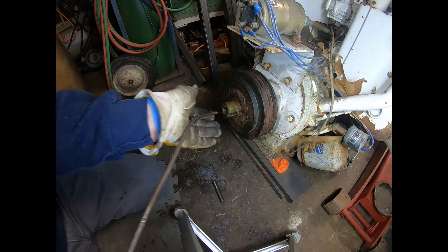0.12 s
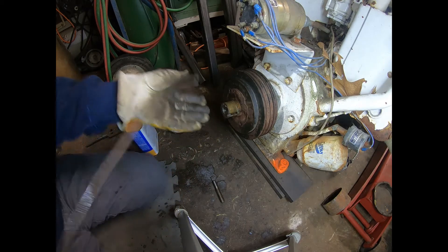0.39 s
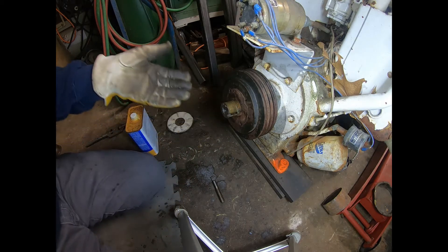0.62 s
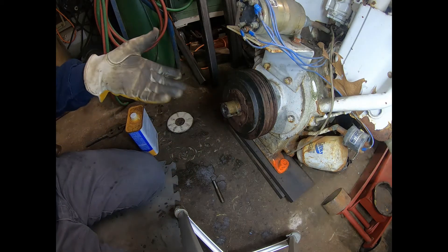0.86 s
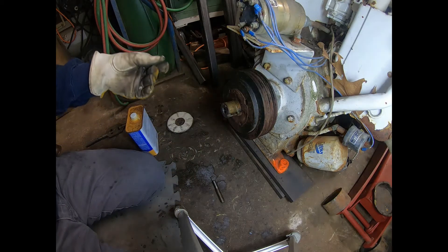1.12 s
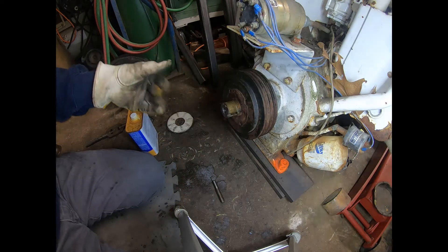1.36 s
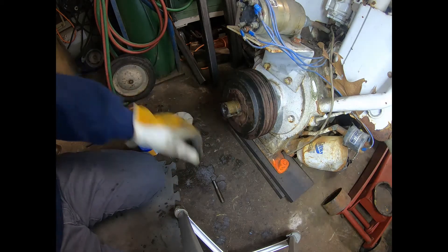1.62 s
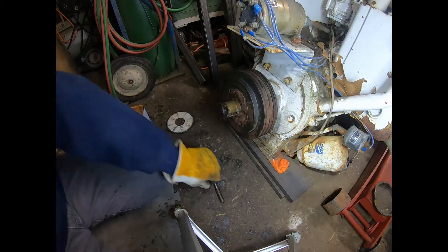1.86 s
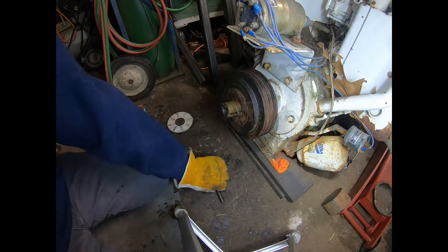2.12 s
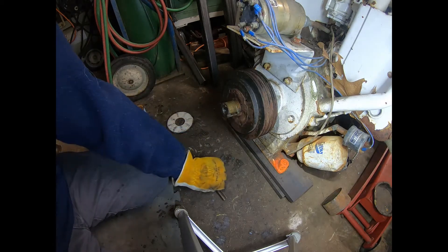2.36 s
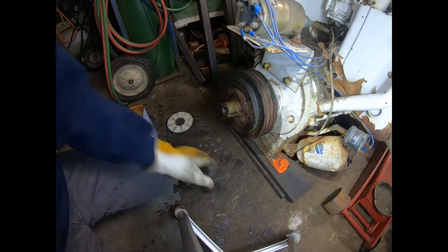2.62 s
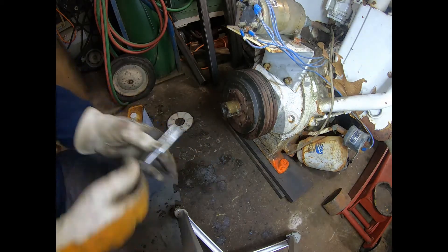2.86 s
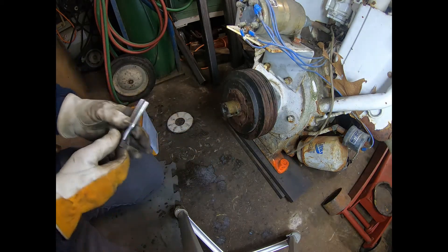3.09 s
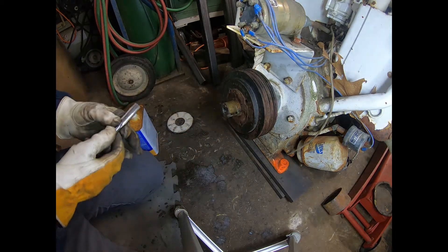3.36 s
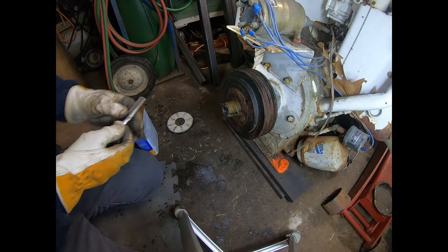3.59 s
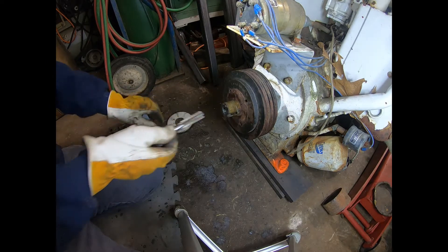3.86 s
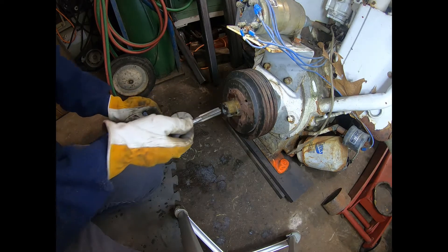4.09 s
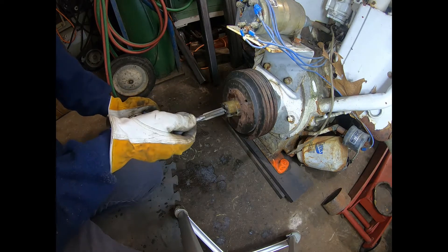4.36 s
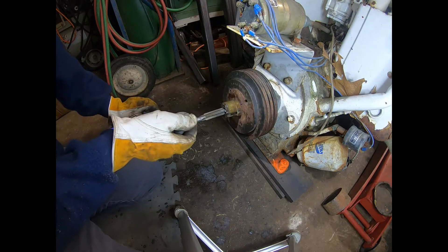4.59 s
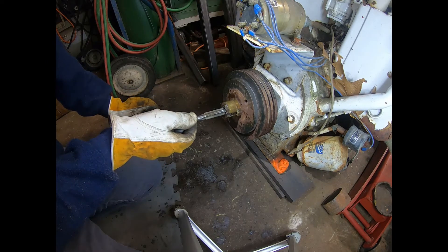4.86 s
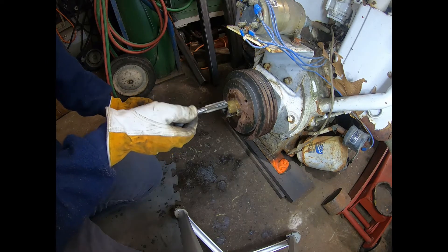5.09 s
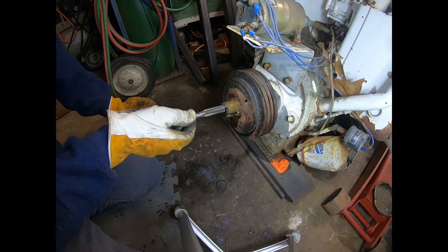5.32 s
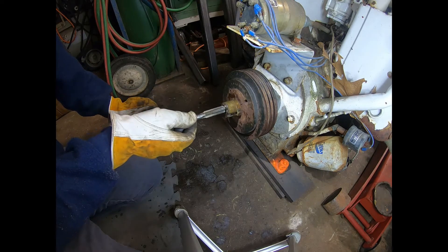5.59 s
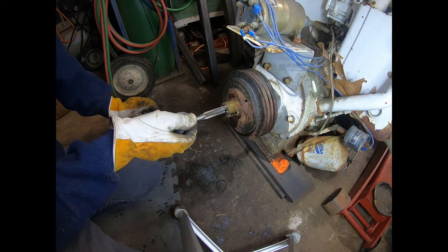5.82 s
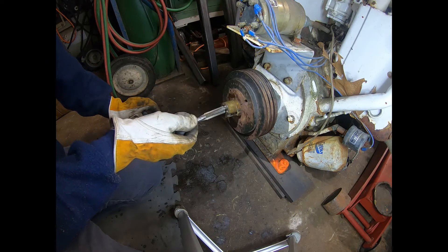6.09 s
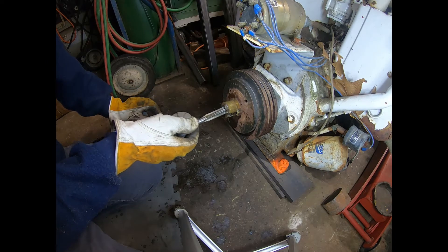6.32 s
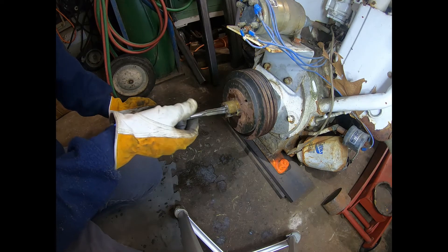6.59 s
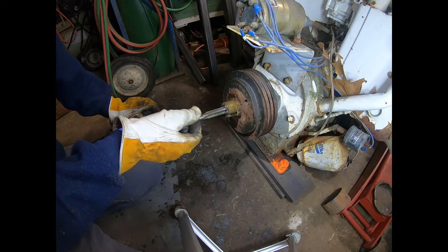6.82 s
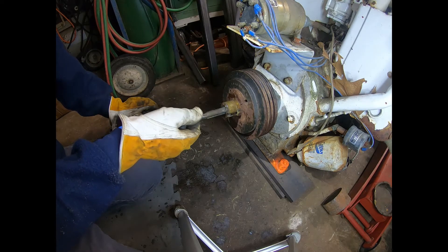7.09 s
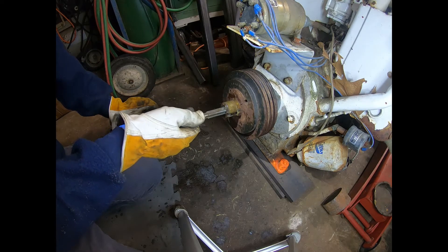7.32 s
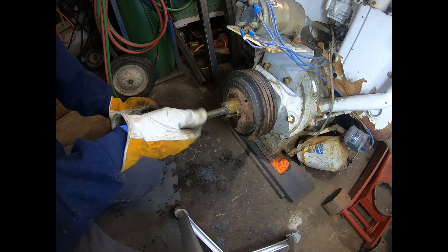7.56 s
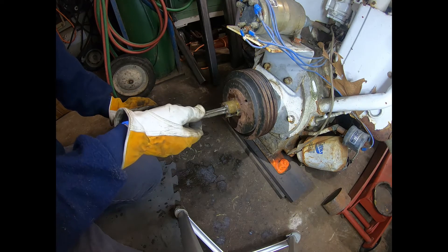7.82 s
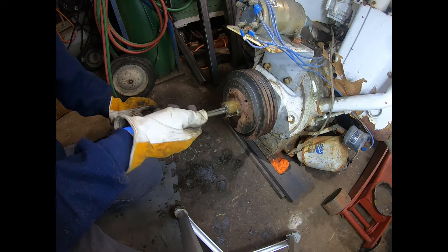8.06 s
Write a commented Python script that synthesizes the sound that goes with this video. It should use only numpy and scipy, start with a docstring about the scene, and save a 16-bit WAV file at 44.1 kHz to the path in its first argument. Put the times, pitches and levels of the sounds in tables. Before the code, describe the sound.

A motor drone with a rapid chugging pulse, about eleven beats a second, fills a small hard-floored garage throughout. Rumble and hum swell over the first couple of seconds and then hold. A short gritty scrape with tiny metallic rings comes close by as a gloved hand picks up a tool. Afterwards only the compressor remains, clattering, rushing and faintly whistling. Mono, close worker's position, the machine a few metres off.

```python
"""A belt-driven piston air compressor runs steadily in a garage, a few metres from the listener.
Its motor hums at twice the mains rate: a sine with sidebands. The pump throbs at multiples of the crank
speed, knocks ring the modes of its housing and valve plate, small parts clatter, and filtered noise makes
the air's rumble, rush and pulsing whistle. A faint narrow noise hisses twice early on, and a small metal
tool scrapes briefly over the concrete floor: grit noise with short decaying rings."""
import sys
import numpy as np
from scipy import signal
from scipy.fft import rfft, irfft
from scipy.io import wavfile

SR = 44100
rng = np.random.default_rng(int(sys.argv[2]) if len(sys.argv) > 2 else 0)


def makeup_ratio(level_db):
    """Linear amplitude ratio for a level in decibels (20 dB per factor of ten)."""
    decades = np.asarray(level_db, float) / 20
    return 10 ** decades


def materialize(psi):
    """Save the field psi as 16-bit PCM at rate SR to the path in sys.argv[1].

    A 1-D psi becomes a single channel; in a 2-D psi each row is a channel.
    """
    bounded = np.clip(np.atleast_2d(psi).T, -1, 1)
    quanta = np.round(bounded * 32767).astype(np.int16)
    wavfile.write(sys.argv[1], SR, quanta)


N = 361177
TIME = np.arange(N) / SR   # s
BIN_HZ = np.maximum(np.arange(N // 2 + 1) * SR / N, 1)

# lift of the middle of the air rush and of the clatter: time_s, lift_db
MIDDLE_LIFT = [(0, 0.5), (1.1, 2.4), (1.8, 4), (2.8, 1.5), (4.6, 1.2), (6.5, 1), (8.19, 2.4)]
# level of the rumble, which the weak crank orders follow: first_db, crest_s, crest_db, settled_db
RUMBLE_SWELL = (-33, 2, -27.5, -29)


def rms_one(x):
    """Normalisation: scales a signal to unit root-mean-square."""
    return x / np.sqrt(np.mean(x ** 2) + 1e-20)


def in_time(rows):
    """Linear interpolation: joins the columns of a table by straight lines in time."""
    s, *columns = np.transpose(rows)
    return [np.interp(TIME, s, column) for column in columns]


def swell(first_db, crest_s, crest_db, settled_db):
    """Level envelope: a quarter-sine rise to a crest, then exponential relaxation over 1 s."""
    rise = first_db + (crest_db - first_db) * np.sin(np.pi / 2 * np.clip(TIME / crest_s, 0, 1))
    return rise + (settled_db - crest_db) * (1 - np.exp(-np.maximum(TIME - crest_s, 0) / 1))


def smooth_step(at_s, span_s):
    """Sigmoid transition: a hyperbolic tangent from 0 to 1."""
    return .5 + .5 * np.tanh((TIME - at_s) / span_s)


def crossfade(count):
    """Equal-power crossfading: sine-law weights of a row of patterns spread over the whole time."""
    place = TIME / TIME[-1] * (count - 1)
    return [np.sin(np.pi / 2 * np.clip(1 - np.abs(place - k), 0, 1)) for k in range(count)]


def drift(rate_hz):
    """Low-pass random process: two equal poles leave a slow wander of spread 1."""
    hop = 40   # samples between the values drawn
    r = np.exp(-2 * np.pi * rate_hz * hop / SR)
    slow = signal.lfilter([1], [1, -2 * r, r * r], rng.standard_normal(N // hop + 2002))
    slow = rms_one(slow[2000:])   # the filter has settled
    return np.interp(np.arange(N) / hop, np.arange(len(slow)), slow)


def sine(turns, db):
    """Pure tone: a cosine of given phase and rms level."""
    return np.sqrt(2) * makeup_ratio(db) * np.cos(2 * np.pi * turns)


def colour(x, spectrum):
    """Linear filtering: gains in dB drawn on a log-frequency axis."""
    hz, db = np.transpose(spectrum)
    gain = makeup_ratio(np.interp(np.log(BIN_HZ), np.log(hz), db, left=-200))
    return irfft(rfft(x) * gain, N)


def band(x, low_hz, high_hz):
    """Band-pass filtering: keeps the part between two corner frequencies."""
    return signal.sosfilt(signal.butter(2, [low_hz, high_hz], "band", fs=SR, output="sos"), x)


def crank_turns():
    """Phase as the integral of frequency: crank turns, the speed sagging as the tank fills."""
    # time_s, speed_turns_per_s
    crank_speed = [(0, 10.927), (3.5, 10.918), (8.19, 10.905)]
    return np.cumsum(in_time(crank_speed)[0]) / SR


def hum_level():
    """Level envelope: the hum's slow course in dB, with a few brief dips of Gaussian shape."""
    # time_s, level_db
    hum_course = [(0, -26), (.55, -23.5), (.8, -18), (1.6, -19), (2.4, -17), (4.5, -16), (5.6, -18.5),
                  (8.19, -18.5)]
    # time_s, depth_db
    hum_dips = [(.45, -12), (1.0, -7), (1.37, -13)]
    dip_span_s = .045
    dips = sum(depth_db * np.exp(-((TIME - s) / dip_span_s) ** 2) for s, depth_db in hum_dips)
    return in_time(hum_course)[0] + dips


def motor(crank):
    """Modulation: the pump's load gives the magnetic hum side tones and shifts the shaft tone."""
    hum_hz, shaft_hz = 119.99, 57.81
    load_lead = .27   # share of a turn by which the load leads the crank
    # side tones: crank_multiple above the hum, first_db, crest_s, crest_db, settled_db
    side_tones = [(1, -56, 4, -24.5, -25.5), (2, -29, 2.6, -27, -30), (4, -36, 6.3, -38, -28.5)]
    # tones beating with the pump: shaft_multiple, crank_multiple, rms_db
    shaft_tones = [(1, 2, -38), (1, 4, -41), (1, 6, -42), (1, 7, -36), (1, 9, -44), (1, 11, -44),
                   (2, 0, -39), (2, 1, -43), (2, 2, -43)]
    hum = hum_hz * TIME - .16
    out = sine(hum, hum_level() + .5 * drift(4))
    for order, *levels in side_tones:
        turns = hum + round(order) * (crank + load_lead) + .025 * drift(2.5)
        out += sine(turns, swell(*levels) + 1.2 * drift(2.5))
    for shaft, order, db in shaft_tones:
        turns = round(shaft) * shaft_hz * TIME + round(order) * crank + rng.random()
        out += sine(turns, db + 1.5 * drift(1.5))
    return out


def throb(crank):
    """Fourier series: pressure pulses as orders of the crank; the room scatters the weak ones in time."""
    # these swell as the listener moves: crank_multiple, first_db, crest_s, crest_db, settled_db
    strong_orders = [(4, -33, 1.1, -28.5, -29.5), (10, -39, 2, -30, -33.5), (14, -45, 1.6, -23, -26),
                     (18, -34, 1.2, -25, -31)]
    # crank_multiple, mean_rms_db
    weak_orders = [(2, -40), (3, -47), (5, -43.5), (6, -34.5), (7, -45), (8, -37), (9, -61), (16, -34.5),
                   (17, -42), (19, -38.5), (20, -39), (21, -39), (22, -42.5), (23, -46), (24, -40.5),
                   (25, -40), (26, -42.5), (27, -44), (28, -48.5), (29, -48), (30, -46), (31, -52),
                   (32, -48), (33, -53.5), (34, -51.5), (35, -53.5), (36, -67), (37, -59.5), (38, -54),
                   (39, -45), (40, -54), (41, -44), (42, -50), (43, -54.5), (44, -60), (45, -67), (46, -42),
                   (47, -60), (48, -42), (49, -65), (50, -50.5), (51, -44), (52, -52)]
    rumble_db = swell(*RUMBLE_SWELL)
    weak_db = rumble_db - np.mean(rumble_db)
    out = np.zeros(N)
    for order, *levels in strong_orders:
        turns = round(order) * crank - .38 + .025 * drift(2.5)
        out += sine(turns, swell(*levels) + 1.2 * drift(2.5))
    for order, db in weak_orders:
        order = round(order)
        # phase and level wander more at high orders
        turns = order * crank + rng.random() + 0.0058 * order * drift(1.7)
        out += sine(turns, db + weak_db + 0.073 * order * drift(1.6))
    return out


def knocks(crank, blows, modes, jitter, soft_hz):
    """Modal synthesis: slightly uneven blows on every turn excite damped resonators; rms 1."""
    blows, turns = np.array(blows), np.arange(int(crank[-1]) + 1)[:, None]
    uneven = jitter * rng.standard_normal((len(turns), len(blows)))   # share of a turn
    when = np.interp(turns + blows[:, 0] + uneven, crank, TIME)
    at = (when * SR).astype(int).ravel()
    out = np.zeros(N)
    for k, (hz, db, t60) in enumerate(modes):
        clicks = np.full(N, 1e-18)
        clicks[at] = makeup_ratio(blows[:, 1] + db + 1.0 * rng.standard_normal(when.shape)).ravel()
        r, w = makeup_ratio(-60 / (t60 * SR)), 2 * np.pi * hz / SR
        ring = signal.lfilter([0, np.sin(w)], [1, -2 * r * np.cos(w), r * r], clicks)
        out += (-1) ** k * ring   # neighbouring modes in opposite phase
    return rms_one(signal.sosfilt(signal.butter(4, soft_hz, fs=SR, output="sos"), out))


def housing(crank):
    """Modal resonance: knocks ring the pump housing, softened by a low-pass."""
    # share_of_turn, relative_db
    housing_knocks = [(.029, -1.2), (.1949, -.9), (.3204, -6.1), (.494, -2), (.7067, -6.8)]
    # frequency_hz, relative_db, t60_s
    housing_modes = [(589.3, -8, .1), (651, 4, .064), (669.3, -.6, .147), (695.9, -1.2, .166),
                     (950, -11, .12), (1222, -18, .2), (1266, -17, .16)]
    # time_s, rms_db
    housing_course = [(0, -43), (.7, -30.5), (1.6, -31), (2.4, -35), (3.9, -32.5), (4.3, -28.5),
                      (5.1, -31.5), (6.2, -27.5), (6.7, -30.5), (8.19, -29.5)]
    ringing = knocks(crank, housing_knocks, housing_modes, jitter=.0004, soft_hz=1300)
    return makeup_ratio(in_time(housing_course)[0]) * ringing


def valve_plate(crank):
    """Modal resonance: knocks ring the valve plate, which sings out more as pressure builds."""
    # share_of_turn, relative_db
    plate_knocks = [(.0696, -6.1), (.2304, -9.3), (.3821, 2.1), (.5584, -5), (.8552, -1.7)]
    # frequency_hz, relative_db, t60_s
    plate_modes = [(1656, 1, .18), (1691.5, 13, .017), (1716, 0, .14), (2240, -11, .07), (3376, -9, .1),
                   (4470, -14, .04), (4560, -13, .04)]
    quiet_db, loud_db = -46, -38.5
    plate_db = quiet_db + (loud_db - quiet_db) * smooth_step(5.5, .45)
    return makeup_ratio(plate_db) * knocks(crank, plate_knocks, plate_modes, jitter=.0001, soft_hz=5000)


def clatter(crank):
    """Periodic noise: small parts repeat a one-turn rattle that slowly gives way to other patterns."""
    # frequency_hz, relative_db
    clatter_colour = [(690, -60), (745, 3), (860, -4), (950, 0), (1060, -4), (1200, 0), (1450, -3),
                      (1600, -9), (1800, -10), (2600, -6), (3200, -30), (4000, -90)]
    count, size = 6, 4096   # patterns, values in one turn
    patterns = rng.standard_normal((count, size))
    where = (crank % 1 * size).astype(int)
    rattle = sum(share * pattern[where] for share, pattern in zip(crossfade(count), patterns))
    return makeup_ratio(-40 + in_time(MIDDLE_LIFT)[0]) * rms_one(colour(rattle, clatter_colour))


def pipes():
    """Resonance: the air excites pipes and cavities, each lifting the gain around its frequency."""
    # frequency_hz, width_hz, lift_db
    resonances = [(345, 3.9, 6.5), (455, 15, 0), (637.4, 32, 8), (954, 40, 5.5), (1470, 110, 2),
                  (2174, 67, 3.5), (2700, 150, 1.5), (4000, 160, 3)]
    return makeup_ratio(sum(db / (1 + (2 * (BIN_HZ - hz) / width_hz) ** 2) for hz, width_hz, db in resonances))


def patchy_noise(spectrum, unit_hz, patchy_db):
    """Turbulence as filtered noise, each octave flickering on its own; rms 1 in the band unit_hz."""
    noise = pipes() * rfft(colour(rng.standard_normal(N), spectrum))
    out, together = 0, drift(1.1)
    for centre in 2. ** np.arange(5, 15):
        # overlapping octave windows that add up to 1
        share = np.cos(np.pi / 2 * np.clip(np.log2(BIN_HZ / centre), -1, 1)) ** 2
        out = out + irfft(noise * share, N) * makeup_ratio(patchy_db * (0.3 * together + drift(19.0)))
    return out / np.std(band(out, *unit_hz))


def rumble():
    """Low-frequency flow noise: patchy noise whose level swells and settles."""
    # frequency_hz, relative_db_per_hz
    rumble_colour = [(10, -45), (36, -36), (55, -14), (72, -13), (100, -8), (135, -3.5), (185, -5),
                     (215, -7), (300, -9), (420, -11), (500, -16), (600, -14), (705, -13), (740, -25),
                     (2000, -90)]
    return makeup_ratio(swell(*RUMBLE_SWELL)) * patchy_noise(rumble_colour, (230, 480), patchy_db=1.8)


def rush(crank):
    """Amplitude-modulated flow noise: the intake gulps once a turn and the treble flickers in patches."""
    # frequency_hz, relative_db_per_hz
    rush_colour = [(450, -13), (760, -4), (870, -8.5), (1180, -5.5), (1600, -11), (2590, -10.5),
                   (3780, -14.5), (4700, -18), (5250, -25.5), (5790, -35), (6710, -31.5), (8600, -34.5),
                   (10100, -47), (11500, -47), (12800, -43.5), (15600, -52)]
    # edges of the flickering treble bands: frequency_hz
    treble_edges = (5600, 6200, 6800, 7400, 8100, 8800, 9600, 10500, 11600, 12800, 14100, 15500)
    stroke = np.maximum(np.cos(2 * np.pi * (crank - .52)), 0) ** 2
    rush_db = swell(-39.5, 1.3, -39.5, -40) + 1.4 * stroke
    air = makeup_ratio(rush_db) * patchy_noise(rush_colour, (1900, 5000), patchy_db=0.67)
    whole, together = rfft(air), .6 * drift(25)
    for low_hz, high_hz in zip(treble_edges, treble_edges[1:]):
        patch = irfft(whole * (BIN_HZ >= low_hz) * (BIN_HZ < high_hz), N)
        air += (makeup_ratio(-2 + together + 2.1 * drift(22)) - 1) * patch
    middle_filter = signal.butter(2, [1000, 2200], "band", fs=SR, output="sos")
    middle = signal.sosfiltfilt(middle_filter, air)   # zero phase, so that it adds in step
    return air + (makeup_ratio(in_time(MIDDLE_LIFT)[0]) - 1) * middle


def garage(x):
    """Reverberation: direct sound plus dense decaying echoes, changing as the listener moves."""
    t60_s, wet_db, places = .25, -8, 6
    tail = np.arange(int(.3 * SR)) / SR
    out = x.copy()
    for near in crossfade(places):
        echoes = rng.standard_normal(len(tail)) * makeup_ratio(-60 * tail / t60_s)
        out += makeup_ratio(wet_db) * near * signal.fftconvolve(x, echoes / np.linalg.norm(echoes))[:N]
    return out / np.sqrt(1 + makeup_ratio(2 * wet_db))


def whistle(crank):
    """Narrow-band noise of air in a narrow passage, amplitude-modulated by puffs past the valves."""
    # time_s, level_db between puffs
    whistle_course = [(0, -54), (1.6, -56), (2.5, -65.5), (3.2, -55), (4.5, -50.5), (5, -63), (5.3, -51),
                      (5.9, -58), (6.5, -55), (7.1, -50), (7.8, -51.5), (8.19, -51)]
    centre_hz, width_hz = 4510, 270
    puff_shares, puff_span, puff_db = (.07, .4, .57, .9), .04, 5   # shares of a turn; lift
    air = band(rng.standard_normal(N), centre_hz - width_hz / 2, centre_hz + width_hz / 2)
    puffs = sum(np.exp(-((crank % 1 - share) / puff_span) ** 2) for share in puff_shares)
    return makeup_ratio(in_time(whistle_course)[0] + 1.2 * drift(6) + puff_db * puffs) * rms_one(air)


def narrow_hiss():
    """Noise-modulated carriers: slow noise sets the bandwidth, which narrows as the pitch rises."""
    # start_s, narrowing_s, end_s, level_db before narrowing
    hisses = [(-.1, 1.06, 1.4, -61.5), (1.9, 2.08, 2.36, -61.5)]
    edge_s, drop_db = .06, -4
    out = np.zeros(N)
    for start_s, narrow_s, end_s, db in hisses:
        thin = smooth_step(narrow_s, edge_s)
        centre_hz = 8300 + (8600 - 8300) * thin
        width_hz = 640 + (288 - 640) * thin
        steps = np.cumsum(width_hz) / SR
        gain = makeup_ratio(db + drop_db * thin) * smooth_step(start_s, edge_s) * (1 - smooth_step(end_s, edge_s))
        # the hiss and two fainter companions above it: frequency ratio, relative dB
        for ratio, below_db in ((1, 0), (1.3, -16), (1.375, -14)):
            rough = np.interp(steps, np.arange(8000), rng.standard_normal(8000))
            carrier = np.cos(2 * np.pi * ratio * np.cumsum(centre_hz) / SR)
            out += makeup_ratio(below_db + 1.8 * drift(25)) * gain * rms_one(rough * carrier)
    return out


def scrape():
    """Stick-slip friction: the tool catches on the floor, rings briefly, then drags through grit noise."""
    # start_s, catch_db, drag_db, ring_db, ring_hz
    catches = [(1.731, -60, -53, -46, 8100), (1.7425, -40, -47, -34, 7800), (1.753, -52, -47, -39, 7900),
               (1.765, -48, -47, -42, 9300), (1.7835, -30, -42, -32, 7300), (1.795, -45, -49, -37, 8500),
               (1.801, -47, -50, -37, 7600), (1.835, -41, -46, -43, 11600), (1.852, -52, -49, -44, 7300),
               (1.904, -54, -54, -47, 8300), (1.9617, -60, -60.5, -44, 8300)]
    # frequency_hz, relative_db
    scrape_colour = [(1200, -30), (2200, -1), (3500, -1), (5200, -3), (6300, -14), (7600, -3), (8800, -7),
                     (10000, -20), (11800, -15), (13500, -23), (15600, -32)]
    catch_s, drag_s, drag_lead_s, ring_t60_s = 0.0073, 0.039, 0.0045, .025
    crackle_db = 1.8 * np.minimum(rng.exponential(1, N), 4) + 1.3 * drift(60)
    grit = rng.standard_normal(N) * makeup_ratio(crackle_db)
    envelope, rings = np.zeros(N), np.zeros(N)
    for s, catch_db, drag_db, ring_db, hz in catches:
        since = TIME - s
        after, apart = since > 0, np.abs(since)
        envelope += makeup_ratio(catch_db) * after * np.exp(-apart / catch_s)
        # the drag builds fast and dies slowly
        envelope += makeup_ratio(drag_db) * np.exp(-apart / np.where(after, drag_s, drag_lead_s))
        rings += after * makeup_ratio(ring_db - 60 * apart / ring_t60_s) * np.sin(2 * np.pi * hz * since)
    return envelope * rms_one(colour(grit, scrape_colour)) + rings


def scene():
    """Superposition: compressor, hiss and scrape add at one microphone."""
    crank = crank_turns()
    pump = throb(crank) + housing(crank) + valve_plate(crank) + clatter(crank)
    air = garage(rumble() + rush(crank)) + whistle(crank)
    mix = motor(crank) + pump + air + narrow_hiss() + scrape()
    return mix[None]


def roll_off(x):
    """The treble ends steeply here."""
    return signal.sosfilt(signal.butter(12, 15710, fs=SR, output="sos"), x)


def record(dry):
    """Soft saturation: the microphone rounds the highest peaks."""
    mix = 0.7 * np.tanh(0.96 * dry / 0.79)
    return roll_off(mix)


dry = scene()
out = record(dry)
materialize(out)
```